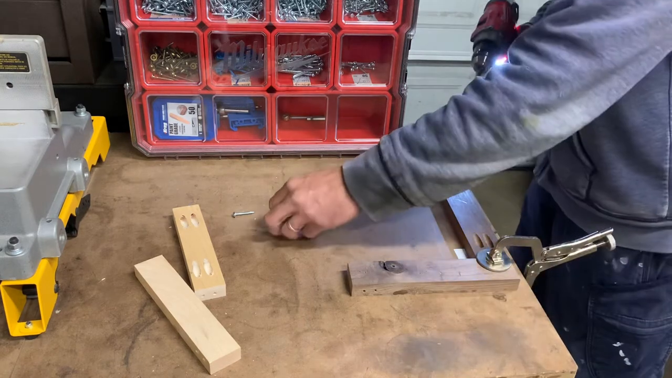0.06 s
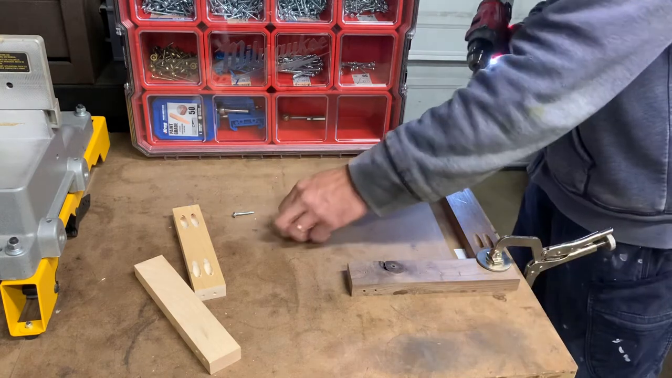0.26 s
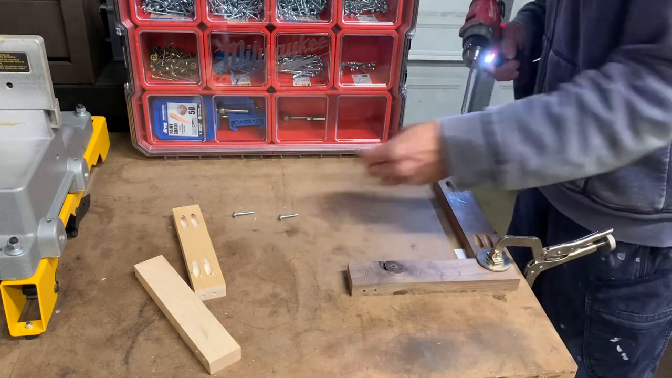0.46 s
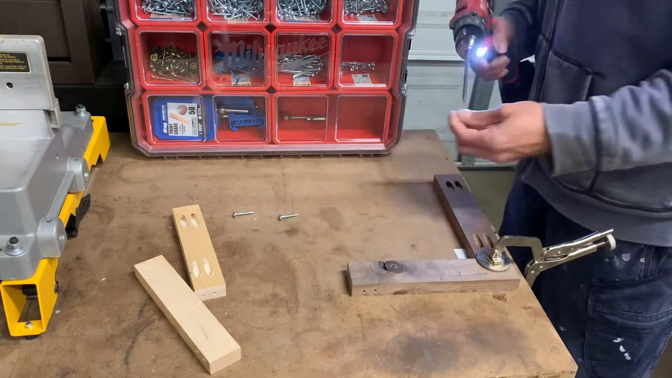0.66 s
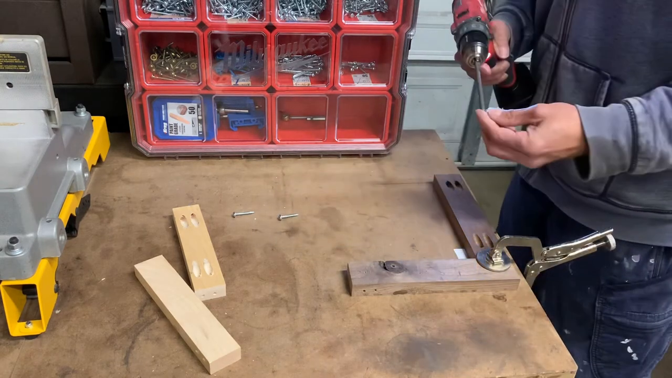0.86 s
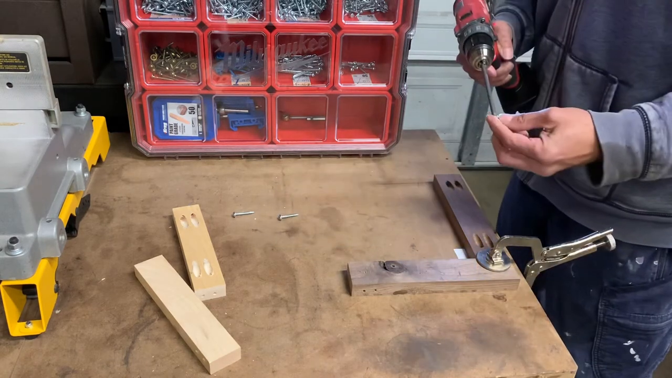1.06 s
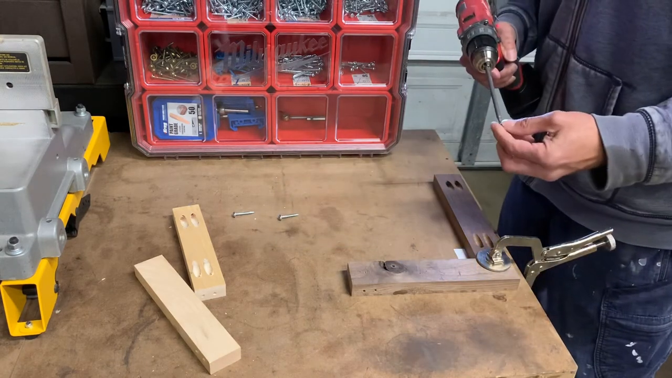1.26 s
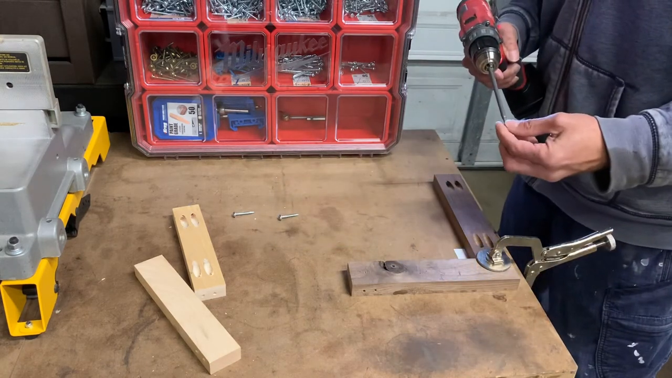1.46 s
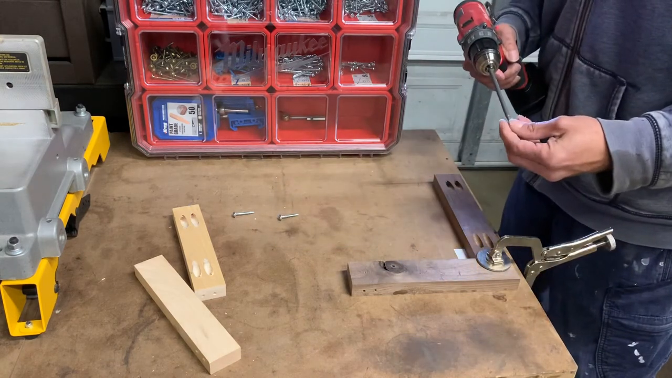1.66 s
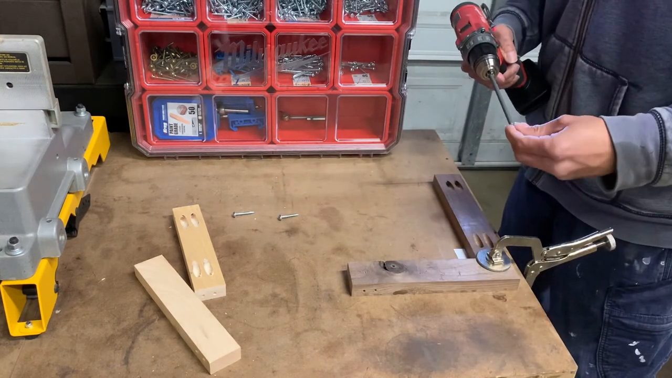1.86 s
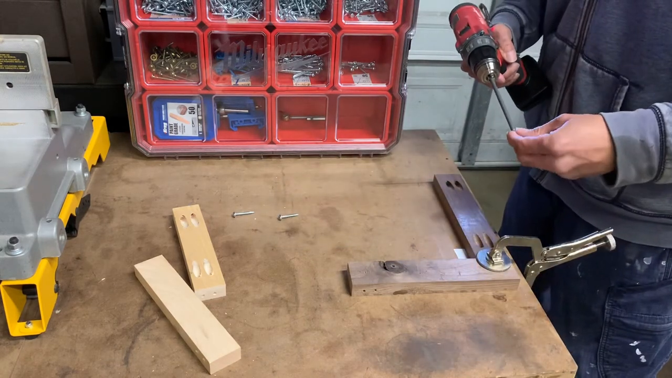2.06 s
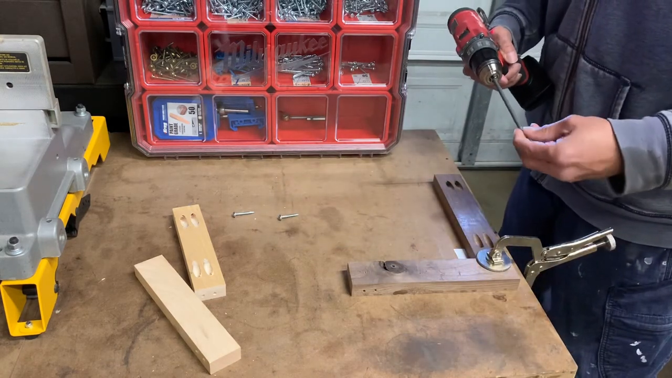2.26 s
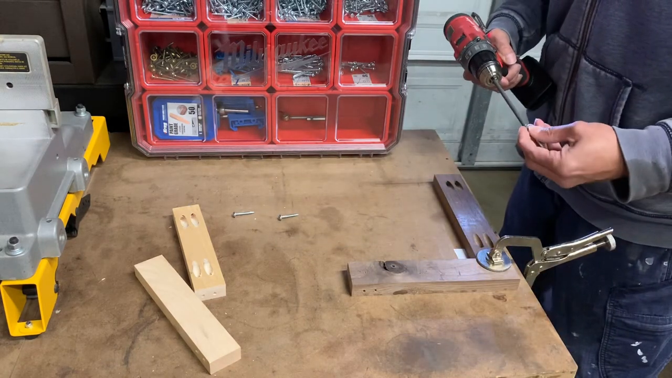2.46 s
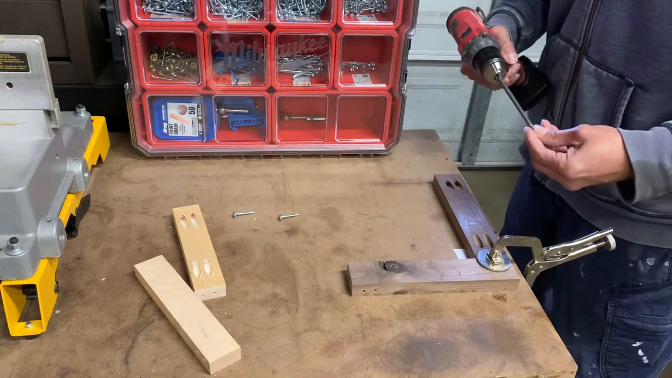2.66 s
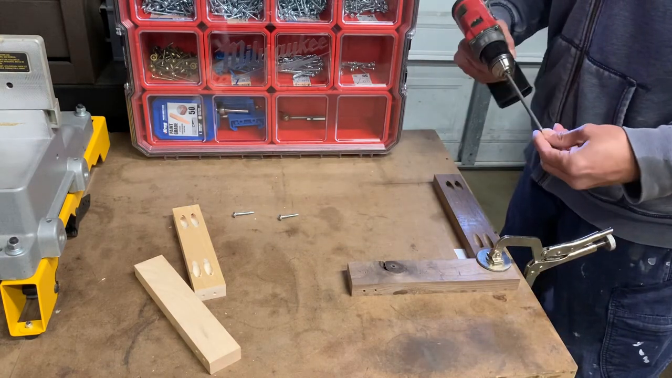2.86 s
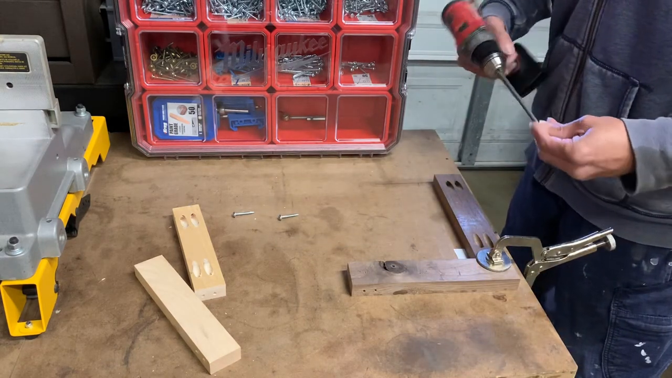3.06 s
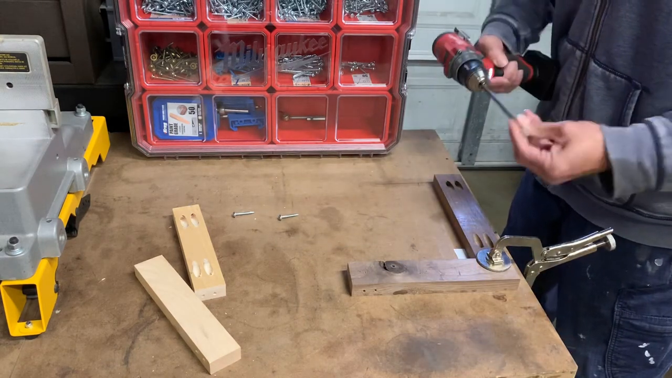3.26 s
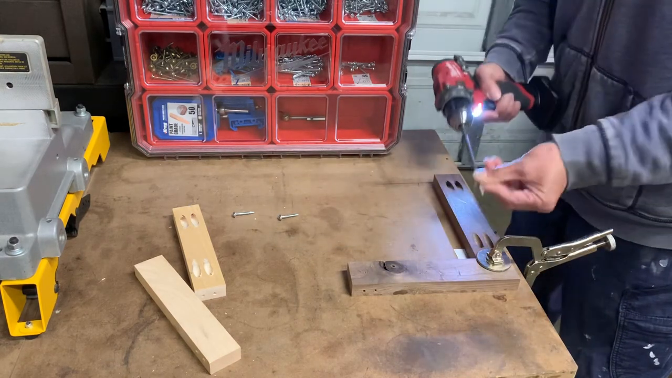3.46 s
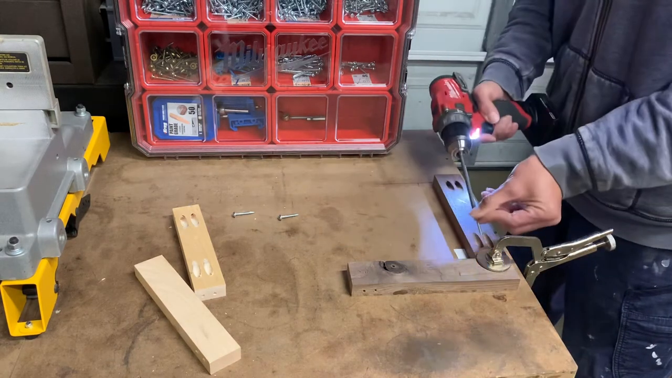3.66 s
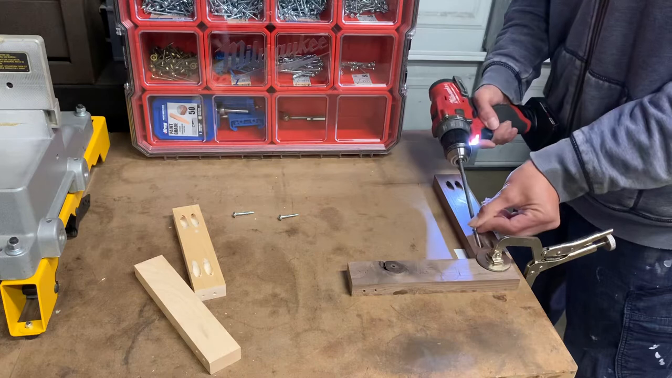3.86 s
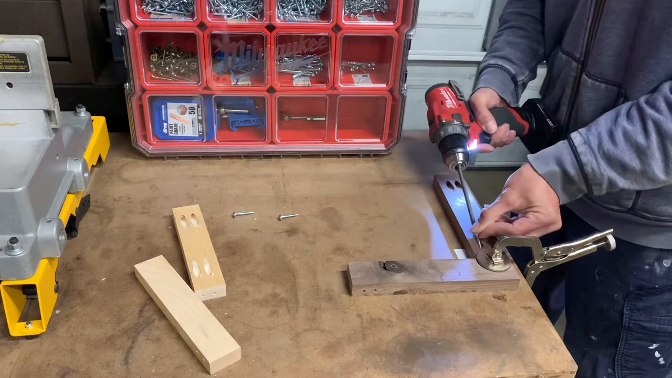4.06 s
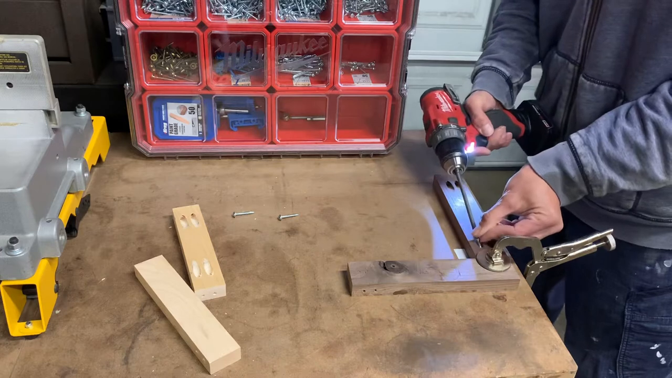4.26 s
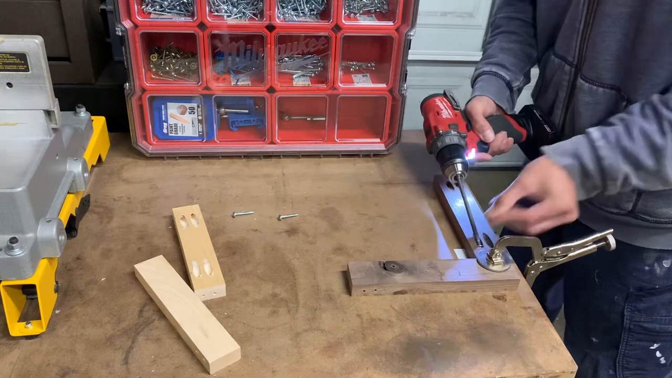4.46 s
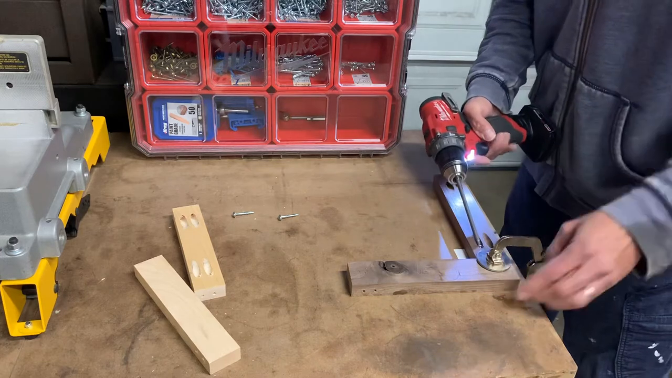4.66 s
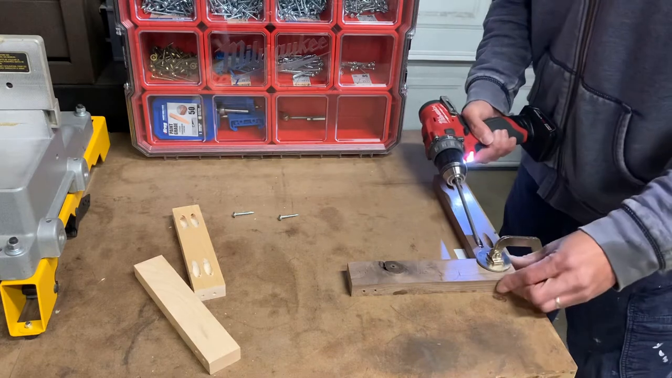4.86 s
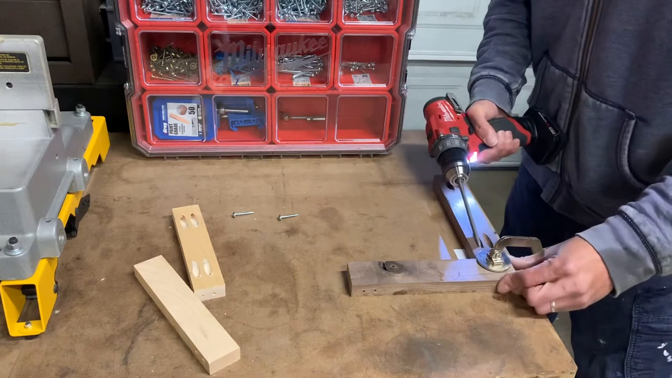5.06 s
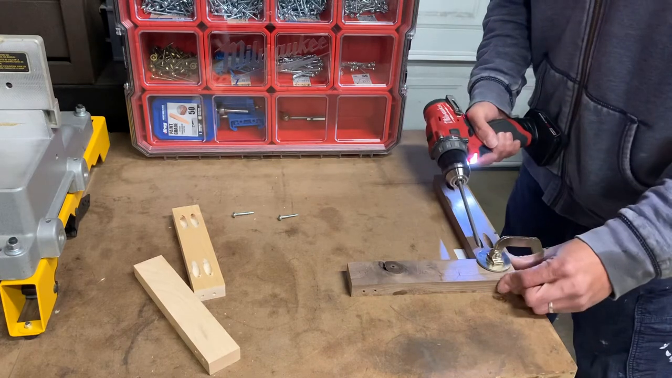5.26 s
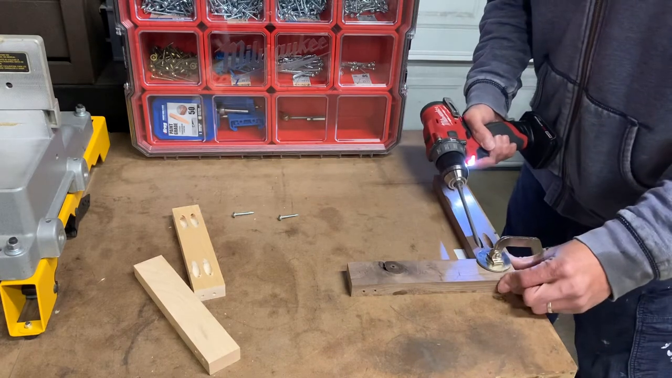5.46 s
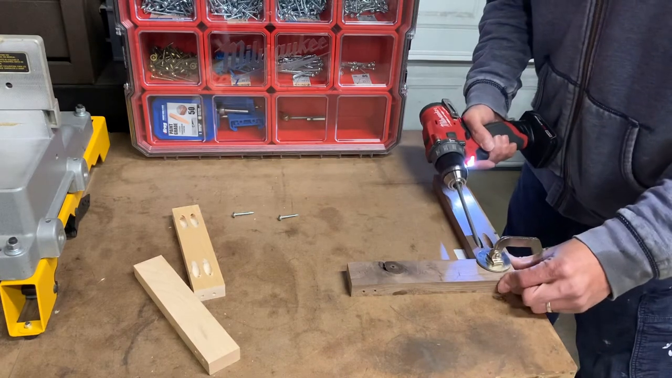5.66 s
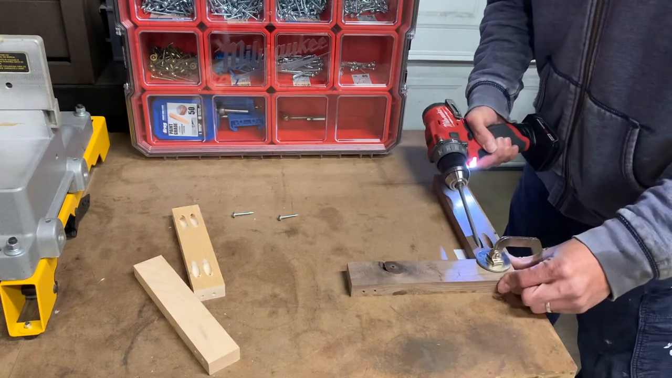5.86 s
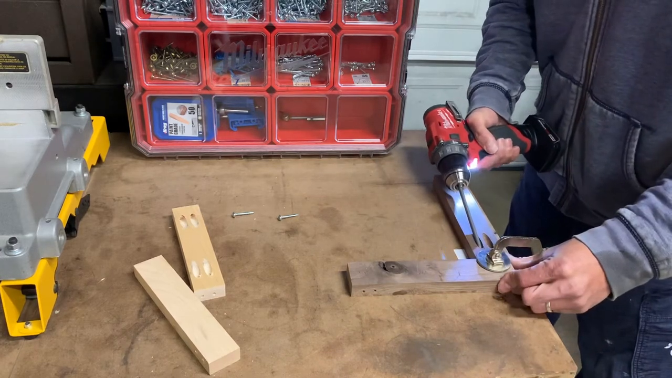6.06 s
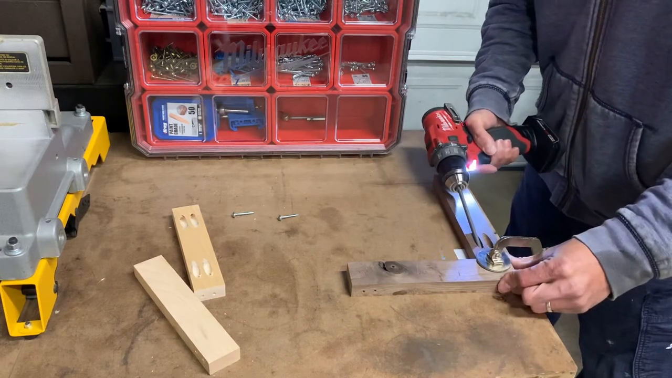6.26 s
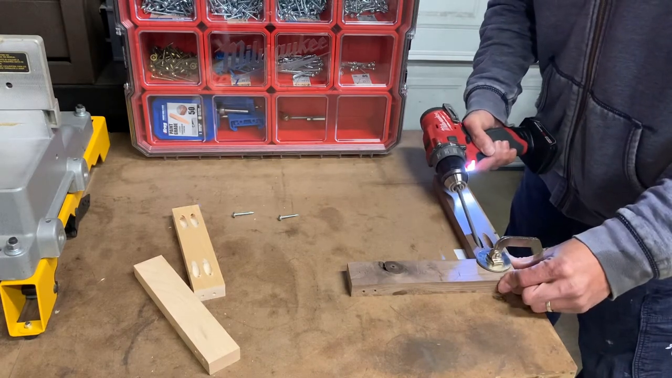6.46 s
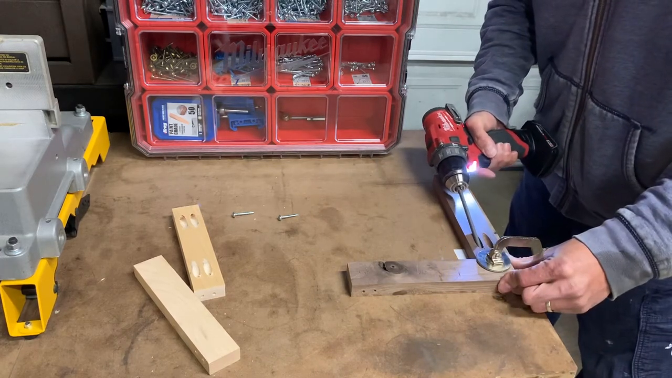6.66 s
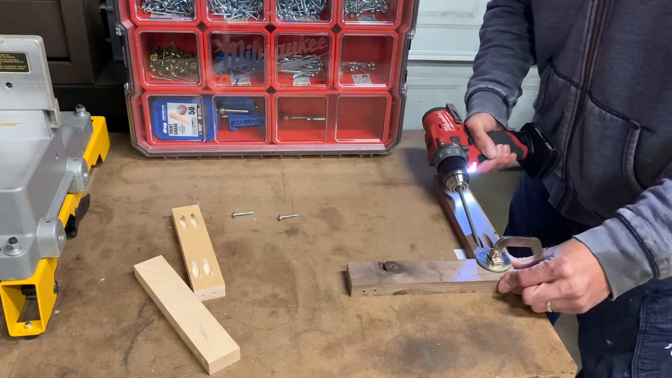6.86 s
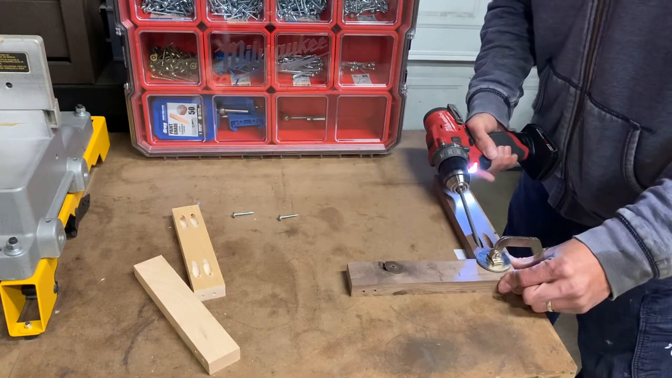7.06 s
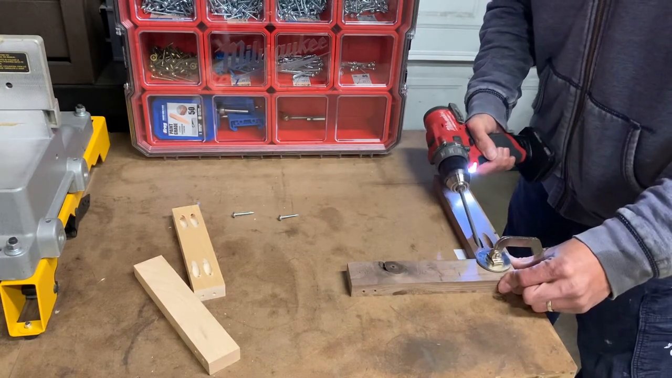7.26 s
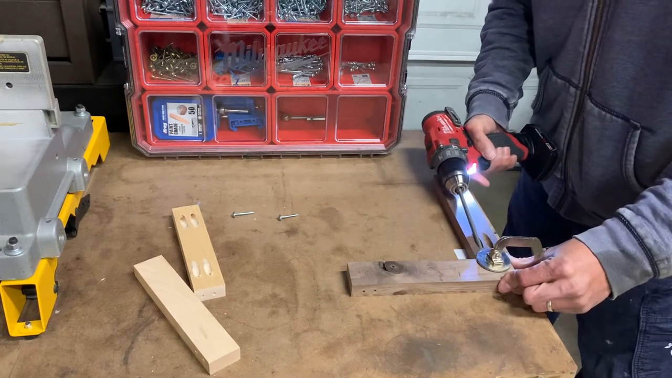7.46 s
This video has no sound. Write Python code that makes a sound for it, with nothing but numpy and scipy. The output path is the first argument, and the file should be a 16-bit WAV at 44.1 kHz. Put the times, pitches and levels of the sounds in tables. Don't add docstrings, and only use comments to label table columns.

```python
import sys
import numpy as np
from scipy import signal
from scipy.fft import rfft, irfft, next_fast_len
from scipy.io import wavfile
from scipy.ndimage import uniform_filter1d

SR = 44100
rng = np.random.default_rng(int(sys.argv[2]) if len(sys.argv) > 2 else 0)


def convert_level_to_amplitude(level_db):
    exponent = np.asarray(level_db, float) / 20
    return 10 ** exponent


def waveform_to_disk(signal):
    frames = np.transpose(np.atleast_2d(signal))
    scaled = np.clip(frames, -1, 1) * 32767
    samples = np.round(scaled).astype(np.int16)
    wavfile.write(sys.argv[1], SR, samples)


N = 331191
TIME = np.arange(N) / SR


def unit(x):
    return x / np.sqrt(np.mean(x ** 2) + 1e-20)


def along(points, hz):
    f, v = np.transpose(points)
    return np.interp(np.log(hz + 1), np.log(f + 1), v)


def filtered(x, response):
    m = next_fast_len(N + SR // 8)
    return irfft(rfft(x, m) * response(np.fft.rfftfreq(m, 1 / SR)), m)[..., :N]


def resonant(x, modes):
    def response(f):
        total = 0
        for k, (centre, width, db) in enumerate(modes):
            damping = 1j * f * width
            total = total + (-1) ** k * convert_level_to_amplitude(db) * damping / (centre * centre - f * f + damping)
        return total
    return filtered(x, response)


def noise(spectrum):
    m = next_fast_len(N)
    re, im = rng.standard_normal((2, m // 2 + 1))
    colour = convert_level_to_amplitude(along(spectrum, np.fft.rfftfreq(m, 1 / SR)))
    return unit(irfft((re + 1j * im) * colour, m)[:N])


def wobble(rate):
    knots = np.arange(int(N * rate / SR) + 2)
    return 1.2 * np.interp(TIME * rate, knots, rng.standard_normal(len(knots)))


def add(track, s, sound):
    part = track[round(s * SR):][:len(sound)]
    part += sound[:len(part)]


def ring(modes, t, rise):
    total = 0
    for k, (hz, db, t60) in enumerate(modes):
        level = db + rng.normal(0, 1.7) - 60 * t / t60
        total = total + (-1) ** k * convert_level_to_amplitude(level) * np.sin(2 * np.pi * hz * t)
    return (1 - np.exp(-t / rise)) * total


def strokes(rows, rise, fall):
    gain = 0
    for s, held, db in rows:
        early = np.clip(s - TIME, 0, None)
        late = np.clip(TIME - s - held, 0, None)
        gain = gain + convert_level_to_amplitude(db - rise * early - fall * late)
    return gain


def background():
    # f/Hz, level per Hz/dB
    drone = [(12, -79), (20, -39), (45, -9), (68, -2.5), (91, -8), (124, 4.5), (156, -15.5), (376, -20.5),
             (406, -24.5), (496, -24), (800, -34), (1040, -79), (1760, -120)]
    # f/Hz, level per Hz/dB
    hiss = [(300, -40), (500, -4.5), (1600, -11.5), (3100, -13), (6000, -16.5), (8500, -15.5), (11000, -14),
            (14000, -16.5), (16500, -22.5)]
    # middle t/s, level/dB, half length/s
    swells = [(.02, -70, .1), (.9, -68.5, .25), (1.6, -71, .3), (3.0, -72.5, 0.22), (4.37, -62, .15),
              (5.043, -52.5, .09), (5.3, -59.5, .2), (6.05, -61, 0.2), (7.5, -49.5, .22)]
    hum_db, lean_s, lean_db, hiss_db = -72.5, 3.74, -63.5, -83.5
    leaning = np.clip((TIME - lean_s) / 0.14 + .5, 0, 1)
    power = convert_level_to_amplitude(2 * hum_db) + convert_level_to_amplitude(2 * lean_db) * leaning
    for s, db, half in swells:
        power = power + convert_level_to_amplitude(2 * db) * np.exp(-((TIME - s) / half) ** 2)
    uneven_db = 1.5 * wobble(8)
    return np.sqrt(power) * convert_level_to_amplitude(3 + uneven_db) * noise(drone) + convert_level_to_amplitude(hiss_db + 2.5) * noise(hiss)


def scuffing():
    # t/s, held/s, level/dB
    scuffs = [(0.001, 0.01, -52), (.1, .11, -68.5), (3.7, .42, -82.5), (4.2, 0.078, -61),
              (4.28, 0.16, -59.5), (4.46, .13, -69), (4.605, .07, -62.5), (4.68, .09, -55.5),
              (4.775, 0.053, -52.5)]
    # f/Hz, level per Hz/dB
    grit = [(120, -44), (200, -15.5), (347, -5.5), (440, -10.5), (1740, -15), (4950, -27), (8580, -34.5),
            (11300, -33.5), (16000, -47.5)]
    return strokes(scuffs, 600, 400) * convert_level_to_amplitude(-1.5) * unit(convert_level_to_amplitude(3.8 * wobble(70)) * noise(grit))


def bench():
    # t/s, peak level/dB, boom level/dB, centre f/Hz
    knocks = [(0.013, -37, -25, 2980), (0.0145, -42.5, -21, 950), (0.026, -40.5, -27, 2500),
              (0.115, -56.5, -1, 1010), (0.17, -51.5, -2, 694), (0.198, -65, 2, 735),
              (0.636, -70.5, 19, 1170), (3.668, -59.5, -3, 1290), (3.696, -58.5, 6, 1200),
              (3.708, -58, 3, 1480), (3.899, -75, 8, 1500), (4.129, -67, 9.5, 993), (4.173, -63, 1, 1220),
              (4.214, -55, 10.5, 1020), (4.252, -53, 3.5, 1700), (4.281, -37, -7.5, 905),
              (4.314, -38.5, 10.5, 853), (4.352, -48, -23, 845), (4.437, -49.5, 3, 754),
              (4.602, -49.5, -23, 2000), (4.789, -31, -17, 2150), (4.859, -20, -25, 2500),
              (4.934, -26, 2, 1500), (5.556, -36, -12.5, 1300), (7.216, -10, -1, 1600),
              (7.2205, -9, -16, 1290), (7.225, -7.5, -7.5, 1290), (7.2305, -5.5, -12, 1220),
              (7.249, -31, -2.5, 875)]
    # f/Hz, level/dB, t60/s
    bench_modes = [(78, -3.5, .15), (98.3, -1.5, 0.19), (134, -2, 0.24), (199.1, -2, 0.2), (293.4, 1, 0.1),
                   (432, 2, 0.075), (695, -10, 0.1), (846, -11.5, 0.1)]
    # f/Hz, width/Hz, level/dB
    boards = [(680, 82, -4.5), (1230, 125, 1.5), (1488, 108, -4.5), (2474, 220, 2)]
    loose_t60, tight_t60, tight_db = .1, .03, -31
    clacks, booms, t = np.zeros(N), np.zeros(N), np.arange(SR // 2) / SR
    for s, db, boom_db, hz in knocks:
        t60 = tight_t60 + (loose_t60 - tight_t60) / (1 + convert_level_to_amplitude(2 * (db - tight_db)))
        band = signal.butter(2, [hz / 2.7, hz * 1.46], "bandpass", fs=SR)
        burst = unit(signal.lfilter(*band, rng.standard_normal(len(t))))
        add(clacks, s, burst * convert_level_to_amplitude(db - 4.5 - 60 * t / max(t60, .01)))
        add(booms, s, convert_level_to_amplitude(db + boom_db - 7.5) * ring(bench_modes, t, 0.0017))
    return convert_level_to_amplitude(-4.5) * clacks + convert_level_to_amplitude(6.5) * resonant(clacks, boards) + booms


def screw():
    # t/s, peak level/dB, click level/dB, chuck level/dB, screw ring level/dB
    ticks = [(0.805, -45, -8.5, -16.5, -28), (0.9772, -55.5, -25, -15, -27), (1.1648, -66, -14, -8, -7),
             (1.1994, -74, -19, -3, -9), (1.5005, -53.5, -26, -9.5, -27), (1.6032, -53.5, -22, -4, -21),
             (1.6127, -48.5, -9, -14.5, -19), (2.1154, -74, -1, -8, -16), (2.2850, -53, -5.5, -12, -20),
             (2.2905, -48, -7, -13, -9), (2.2972, -45, -5, -9.5, -10), (2.3192, -53, -21.5, -30, -14),
             (2.3744, -66, -18.5, -18, -13), (2.5744, -61, -18.5, -12, -23), (2.5866, -47, -15, -12.5, -17),
             (3.1244, -74.5, -10, 7.5, -14)]
    # t/s, peak level/dB, click level/dB, chuck level/dB
    hunting = [
        (3.696, -69, -25, 11),
        (4.3075, -36.5, -20, -2.5),
        (4.3395, -38, -18, -13),
        (4.3744, -42.5, -24, -5),
        (4.5516, -58, -1, -5),
        (4.6763, -33, -21, -6),
        (4.7132, -34.5, -21.5, -9.5),
        (4.7401, -39.5, -19, -3.5),
        (4.7676, -42, -4, -2),
        (4.8589, -17.5, -23, -10),
    ]
    # f/Hz, level/dB, t60/s
    steel = [(4000, -11, .12), (4700, -4, 0.076), (4850, 6, 0.14)]
    # f/Hz, width/Hz, level/dB
    long_bit = [(3806, 225, 2), (4370, 850, -3), (6040, 300, -7.5), (7180, 770, -13.5)]
    # f/Hz, width/Hz, level/dB
    free_chuck = [(1690, 165, 4.5), (2500, 170, -16)]
    # f/Hz, width/Hz, level/dB
    seated_chuck = [(868, 92, 1), (1560, 320, -2), (2550, 200, -1.5)]
    # f/Hz, width/Hz, level/dB
    bare_contact = [(11000, 7000, 5)]
    out, bit, chuck, seat, clicks = np.zeros((5, N))
    t = np.arange(SR // 5) / SR
    for holder, rows in ((chuck, ticks), (seat, hunting)):
        for s, db, click_db, chuck_db, *ring_db in rows:
            contact = convert_level_to_amplitude(db - 60 * t / 0.044) * rng.standard_normal(len(t))
            add(bit, s, convert_level_to_amplitude(6.5) * contact)
            add(holder, s, convert_level_to_amplitude(chuck_db + 13) * contact)
            click_decay = convert_level_to_amplitude(db + click_db + 7.5 - 60 * t / 0.014)
            add(clicks, s, click_decay * rng.standard_normal(len(t)))
            for level in ring_db:
                add(out, s, convert_level_to_amplitude(db) * convert_level_to_amplitude(level - 2) * ring(steel, t, .0005))
    shaken = resonant(bit, long_bit) + resonant(chuck, free_chuck) + resonant(seat, seated_chuck)
    return out + shaken + resonant(clicks, bare_contact)


def sleeve():
    # t/s, held/s, level/dB
    rustles = [
        (2.745, .155, -89),
        (3.1, .08, -90),
        (3.32, 0.26, -89),
    ]
    cloth = unit(resonant(rng.standard_normal(N), [(2650, 450, 0.1)]))
    return strokes(rustles, 200, 300) * cloth


def drill():
    # start t/s, standstill t/s, top shaft f/Hz, time until the thread frees the shaft/s
    pulls = [
        (4.845, 5.097, 447, 0),
        (5.263, 5.443, 405, .001),
        (5.714, 5.86, 360, .008),
        (6.034, 6.195, 355, .005),
        (6.391, 6.524, 330, .005),
        (6.736, 6.886, 325, .009),
        (7.134, 7.255, 275, .005),
    ]
    # push level/dB, bite of the thread level/dB
    effort = [
        (-.8, -7),
        (-0.86, -1.5),
        (0.15, 0.3),
        (-0.9, -.6),
        (-.4, 0.3),
        (.1, .4),
        (2.3, 0.7),
    ]
    # f/Hz, width/Hz, level/dB
    housing = [(430, 76, 7), (1500, 830, 4.5), (3330, 400, 10.5), (5870, 2300, -2)]
    # f/Hz, width/Hz, level/dB
    gearbox = [(3390, 360, 2.1), (5400, 2200, -9)]
    # f/Hz, level per Hz/dB
    rush_colour = [(500, -48), (900, -11), (1700, -8.5), (2500, -8.5), (3350, -15), (4300, -10),
                   (5800, -10.5), (8000, -5.5), (9000, -1), (10000, -7), (12000, -12), (14000, -15),
                   (15700, -20), (16500, -65)]
    # f/Hz, level per Hz/dB
    growl_colour = [(24, -46), (40, -31.5), (182, -16), (301, 0), (366, -21.5), (460, -1), (503, -24.5),
                    (661, -5), (882, -7.5), (1500, -21.5), (1950, -27), (3300, -120)]
    spin_up, brake = 3900, 6700
    poles, teeth, chopper_hz = 4, 16, 9896
    rush_db, growl_db, unbalance_db, whine_db, mesh_db = -22.3, -28.5, -31, -36, -29
    shaft_hz, levels, live = np.zeros(N), np.zeros((5, N)), np.zeros(N)
    for (start, still, top_hz, stuck), (push, bite) in zip(pulls, effort):
        db = [rush_db + push, growl_db + bite, unbalance_db,
              whine_db + 0.0193 * (top_hz - 345),
              mesh_db + 1.3 * push]
        free = np.clip(spin_up * (TIME - start - stuck) / top_hz, 0, None)
        braked = np.clip(brake * (still - TIME), 0, None)
        run_up = (free + 1e-3) ** -7
        run_down = (braked / top_hz + 1e-3) ** -7 / 1.6
        speed = top_hz * (run_up + 1 + run_down) ** (-1 / 7) * (TIME > start) * (TIME < still)
        shaft_hz += speed
        levels += convert_level_to_amplitude(np.array(db))[:, None] * (speed > 0)
        live += (TIME > start - .015) * (braked > top_hz)
    rush_gain, growl_gain, unbalance_gain, whine_gain, mesh_gain = levels
    turn = 2 * np.pi * np.cumsum(shaft_hz * (1 + 0.004 * wobble(120))) / SR
    pace = shaft_hz / 350

    def tone(order):
        return convert_level_to_amplitude(2.5 * wobble(70)) * np.sin(order * turn + .06 * order * wobble(250))

    unbalance = unbalance_gain * pace * tone(1)
    pole_tones = tone(poles) + convert_level_to_amplitude(-1.5) * tone(2 * poles)
    whine = unbalance + whine_gain * pace ** 2.04 * pole_tones
    uneven = convert_level_to_amplitude(4 * wobble(130)) * np.sin(teeth * turn + .92 * wobble(500))
    mesh = resonant(mesh_gain * np.clip(pace - .3, 0, .3) * uneven, gearbox)
    rattle = convert_level_to_amplitude(0.92 * wobble(500) + 2.3 * wobble(50)) * (1 + 0.17 * np.cos(turn))
    rush = rush_gain * (0.13 + np.tanh(1.26 * pace)) * unit(rattle * noise(rush_colour))
    gear_ring = unit(resonant(rattle * rng.standard_normal(N), gearbox[:1]))
    singing = convert_level_to_amplitude(-9) * rush_gain * np.tanh(4 * pace) * gear_ring
    growl = growl_gain * pace ** 1.075 * unit(convert_level_to_amplitude(2.64 * wobble(40)) * noise(growl_colour))
    chopper = convert_level_to_amplitude(-38.5) * uniform_filter1d(live, size=400) * np.sin(2 * np.pi * chopper_hz * TIME)
    return resonant(whine, housing) + convert_level_to_amplitude(2 * 6.73) * mesh + rush + singing + growl + chopper


def trigger():
    # t/s, peak level/dB, lag until the switch snaps back/s
    releases = [
        (5.197, -36.5, .0233),
        (5.649, -36.5, .0232),
        (5.966, -39, .0261),
        (6.3185, -40.5, .0305),
        (6.6733, -36.5, .0235),
        (7.0637, -39, .0251),
        (7.3694, -44, .04),
    ]
    # f/Hz, level per Hz/dB
    plastic = [(400, -22), (1000, -2.5), (3200, 1.5), (5500, -7), (7000, -4.5), (9000, -4.5), (11000, -7),
               (14000, -6.5), (16700, -20)]
    snap_db = -5.5
    shape, t = np.zeros(N), np.arange(SR // 20) / SR
    for s, db, lag in releases:
        add(shape, s, convert_level_to_amplitude(db - 4.5 - 60 * t / 0.034))
        add(shape, s + lag, convert_level_to_amplitude(db + snap_db - 5 - 60 * t / .03))
    return shape * noise(plastic)


def jolt():
    # t/s, rattle level/dB, lingering rattle level/dB, boom level/dB
    kick = (7.2238, -20.5, -39, -21)
    # f/Hz, level per Hz/dB
    parts = [(300, -28), (1200, -1), (3200, -1), (6000, -8), (11000, -12), (16000, -25)]
    s, rattle_db, linger_db, boom_db = kick
    t = np.clip(TIME - s, 0, None)
    dying = convert_level_to_amplitude(rattle_db - 60 * t / 0.19) + convert_level_to_amplitude(linger_db - 60 * t / .6)
    rattle = dying * unit(convert_level_to_amplitude(3.8 * wobble(90)) * noise(parts))
    swing = convert_level_to_amplitude(boom_db - 60 * t / 0.37) * (1 - np.exp(-t / .012)) * np.sin(2 * np.pi * 133 * t)
    shelf = convert_level_to_amplitude(-50.5 - 60 * t / 1.8) * np.sin(2 * np.pi * 203 * t)
    return (TIME > s) * (rattle + swing + shelf)


def garage(x):
    # f/Hz, t60/s
    decay = [(150, 0.49), (430, 0.3), (1000, 0.34), (4000, 0.31), (10000, 0.19)]
    out, step = np.zeros((2, N + SR)), SR // 3
    for i in range(0, N, step):
        hz, t, z = signal.stft(rng.standard_normal((2, SR // 2)), SR, nperseg=256)
        fading = convert_level_to_amplitude(-60 * t / along(decay, hz)[:, None])
        tail = signal.istft(z * fading, SR, nperseg=256)[1]
        echo = signal.fftconvolve(x[None, i:i + step], tail / np.linalg.norm(tail[0]), axes=1)
        out[:, i + 200:i + 200 + echo.shape[1]] += echo
    return out[:, :N]


def scene():
    near = drill() + screw() + trigger() + bench() + jolt() + scuffing() + sleeve()
    facets = rng.standard_normal(1500) * convert_level_to_amplitude(-60 * TIME[:1500] / .05)
    scattered = signal.oaconvolve(near, facets / np.linalg.norm(facets))[:N]
    return [near, scattered] + convert_level_to_amplitude(-9) * garage(near) + [background(), background()]


def low_pass(x):
    return signal.sosfilt(signal.butter(12, 16810, fs=SR, output="sos"), x)


def record(dry):
    # f/Hz, coherence 0-1
    alike = [(40, .93), (100, .995), (200, .99), (350, .85), (700, .5), (1500, .5), (3000, .3), (5500, .2),
             (6500, .65), (8000, .96), (16000, .98)]
    # f/Hz, level/dB
    tilt = [(60, 2.5), (110, 1.5), (200, 1.5), (380, 0.5), (700, 4), (1290, 2), (2380, 0), (4400, -2.5),
            (8120, 0), (15000, 0.5)]
    slip_from_hz, slip_cycle_hz = 6200, 4850

    def sharing(hz):
        angle = np.arccos(np.clip(along(alike, hz), 0, .995)) / 2
        return np.array([np.cos(angle), np.sin(angle)])

    def channel_responses(hz):
        half_turns = np.pi * np.clip(hz - slip_from_hz, 0, None) / slip_cycle_hz
        slip = half_turns - .17 * np.sin(4 * half_turns)
        left = convert_level_to_amplitude(along(tilt, hz) / 2) * np.exp(-1j * slip)
        return np.array([left, 1 / left]) * (hz < 16000)

    shared, differ = filtered(dry, sharing)
    channels = filtered(np.array([shared + differ, shared - differ]), channel_responses)
    return low_pass(channels)


dry = scene()
out = record(dry)
waveform_to_disk(out)
```